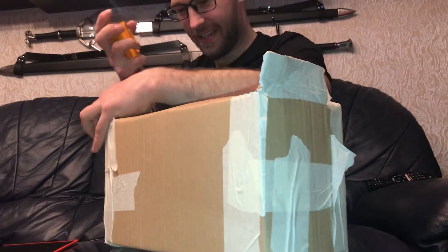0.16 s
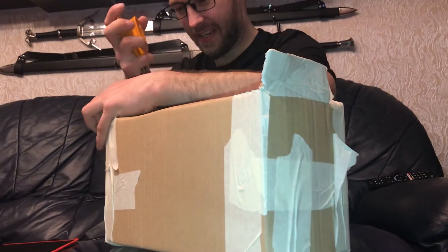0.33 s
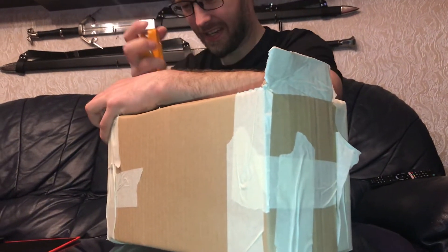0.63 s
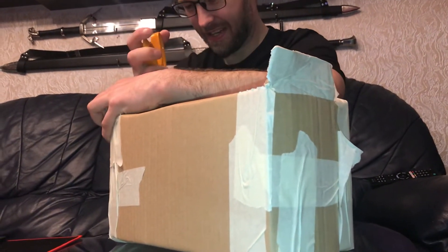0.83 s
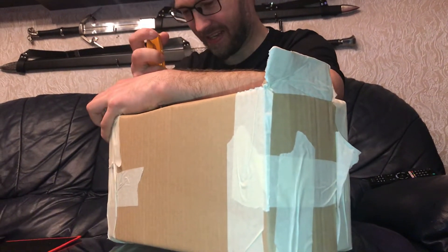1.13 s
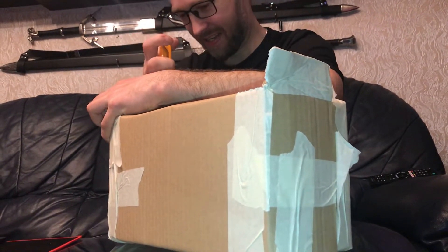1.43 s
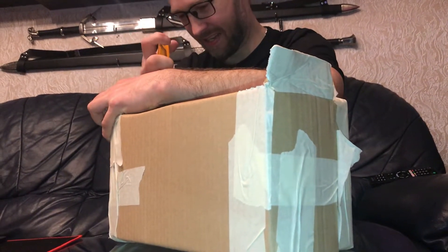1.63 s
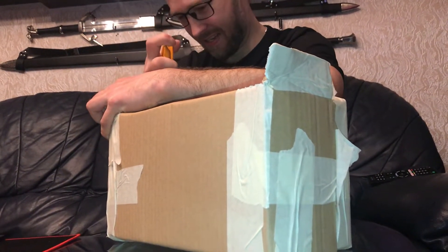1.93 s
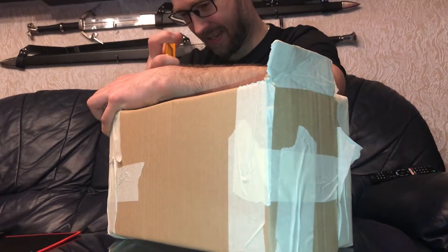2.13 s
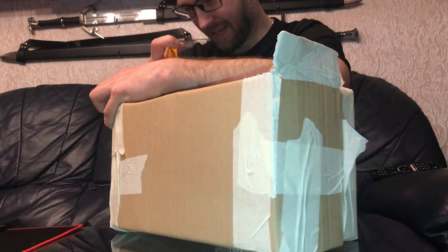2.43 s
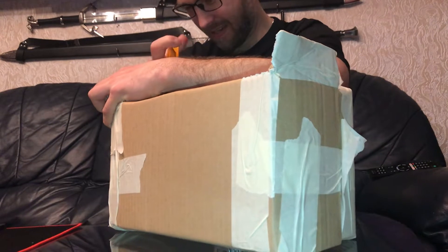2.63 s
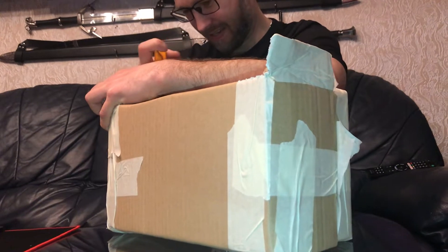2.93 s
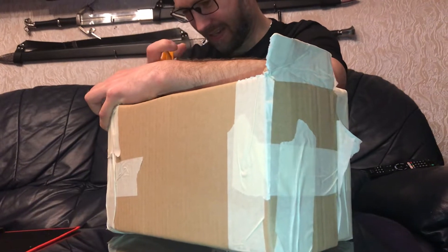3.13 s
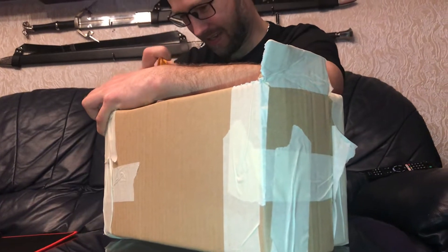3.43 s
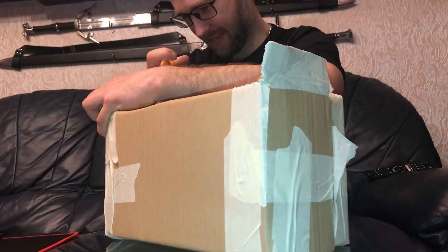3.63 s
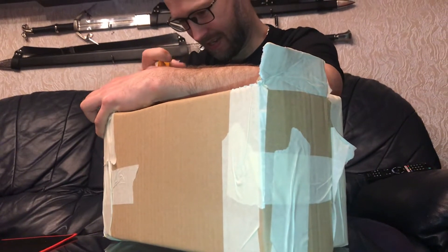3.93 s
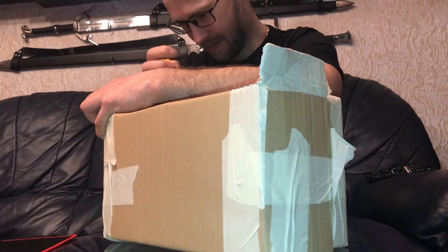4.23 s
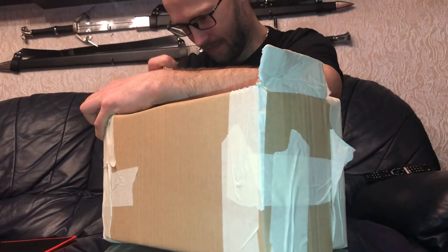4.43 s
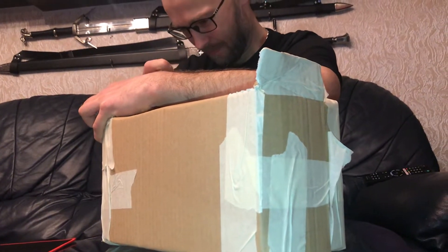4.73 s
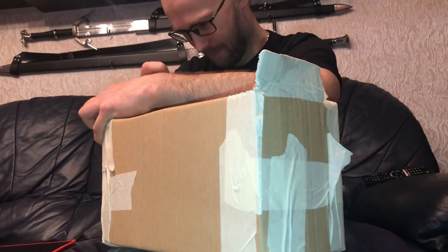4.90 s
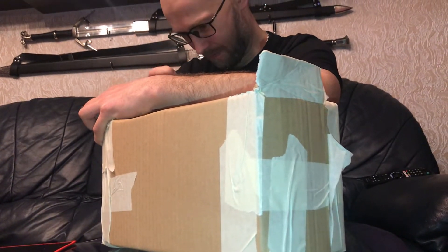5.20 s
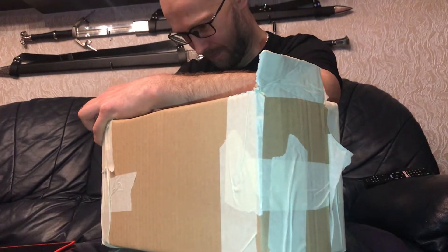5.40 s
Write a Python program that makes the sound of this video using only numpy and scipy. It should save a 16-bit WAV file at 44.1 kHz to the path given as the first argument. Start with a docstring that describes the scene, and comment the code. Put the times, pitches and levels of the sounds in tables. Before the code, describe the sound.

Cardboard and tape are cut up close: gritty scraping, crisp cracks and soft boxy bumps, the loudest snaps coming near the end.

```python
"""A taped cardboard box is cut open with a small knife, close up in a quiet living room.
Under it all lie a low rumble with soft hiss and the faint rustle of an arm on the lid. Tape and board snap
at once: bursts of breaking fibres ring the box, and the room answers briefly. Soft bumps boom the air inside,
creases tick, a faint thin whistle swells; from half a second the blade rasps in strokes of noisy fibre breaks.
The hardest snaps come just after 1 s and near 4.8 s; a faint lower tone joins the last strokes at 5.5 s."""
import sys
import numpy as np
from scipy import signal
from scipy.fft import rfft, irfft
from scipy.io import wavfile

SR = 44100
rng = np.random.default_rng(int(sys.argv[2]) if len(sys.argv) > 2 else 0)


def bounce(signal):
    """Save signal as a 16-bit WAV file at the path given by the first command-line argument."""
    frames = np.transpose(np.atleast_2d(signal))
    limited = np.clip(frames, -1, 1)
    pcm = np.round(limited * 32767).astype(np.int16)
    wavfile.write(sys.argv[1], SR, pcm)


N = 245195


def undb(db):
    """Decibels to gain."""
    return 10 ** (np.asarray(db) / 20)


def unit(x):
    """Scale to an rms of one."""
    return x / np.sqrt(np.mean(x ** 2) + 1e-30)


def contour(points, hz):
    """Read (Hz, value) points on a log-frequency axis."""
    f, value = np.transpose(points)
    return np.interp(np.log(hz + 1), np.log(f), value)


def response(points, size=1024):
    """Causal (minimum-phase) impulse response with the given spectrum."""
    level_db = contour(points, np.fft.rfftfreq(size, 1 / SR))
    cepstrum = irfft(np.log(undb(level_db)))
    # folding the cepstrum forward puts all the sound after the impulse
    cepstrum[1:size // 2] *= 2
    cepstrum[size // 2 + 1:] = 0
    return irfft(np.exp(rfft(cepstrum)))


def ring(modes, size=4096):
    """Impulse response of damped resonances, neighbours swinging in opposite senses; 0 dB is a gain of one."""
    t = np.arange(size) / SR
    out = np.zeros(size)
    for k, (hz, width, db) in enumerate(modes):
        gain = (-1) ** k * undb(db) * 2 * np.pi * width / SR
        out += gain * np.exp(-np.pi * width * t) * np.cos(2 * np.pi * hz * t)
    return out


def through(x, impulse):
    """Pass a sound through an impulse response."""
    return signal.fftconvolve(x, impulse)[:len(x)]


def add(track, s, sound):
    """Mix a sound into the track at time s."""
    start = max(int(s * SR), 0)
    track[start:start + len(sound)] += sound[:N - start]


def walk(rate):
    """Smooth random wander of about unit size, taking a new target `rate` times a second."""
    knots = rng.standard_normal(8192)
    return np.interp(np.arange(N) / SR * rate, np.arange(len(knots)), knots)


def fibres(size, share, spread_db):
    """Tiny breaks of uneven strength, in a given share of all instants."""
    breaks = rng.random(size) < share
    return breaks * rng.standard_normal(size) * undb(spread_db * rng.standard_normal(size))


def blow(x, db):
    """Give a short sound the energy of a steady level held for 10 ms."""
    return x * undb(db) * np.sqrt(.01 * SR / (np.sum(x ** 2) + 1e-30))


# Colour of the quiet room. Each row: frequency in Hz, relative level in dB per Hz.
HUSH_SPECTRUM = [(20, -22), (33, -2), (50, 2), (75, 3.5), (100, -4), (122, 7.5), (160, -2.5), (260, -6.5),
                 (450, -9), (1100, -14), (2000, -20), (4500, -22), (10000, -32.5), (16000, -33.5)]


def hush(level_db=-60.5):
    """The quiet room: steady noise shaped into a low rumble and a soft hiss."""
    colour = undb(contour(HUSH_SPECTRUM, np.fft.rfftfreq(N, 1 / SR)))
    noise = irfft(rfft(rng.standard_normal(N)) * colour, N)
    return unit(noise) * undb(level_db)


# Stiff board resonances. Each row: frequency in Hz, width in Hz, relative level in dB.
BOARD_MODES = [(935, 540, -5), (1128, 164, 3.5), (1379, 89, -1.5), (1632, 110, -6)]
# Colour of cracking tape. Each row: frequency in Hz, relative level in dB per Hz.
CRACK_SPECTRUM = [(700, -6.5), (1300, -2.5), (1750, 1), (2000, 2.5), (2400, 0.5), (2850, 1), (3400, -1.5),
                  (4100, -2.5), (4850, -9), (5800, -10.5), (7500, -26), (12000, -58.5)]
# Bright top of the tape sound. Each row: frequency in Hz, relative level in dB per Hz.
SIZZLE_SPECTRUM = [(3000, -23), (5200, 4), (6500, 7), (7500, 2.5), (9000, 3.5), (10200, -2), (12500, -1),
                   (16000, -5.5)]
# How the arm's rustle comes and goes. Each row: time in seconds, relative level in dB.
RUSTLE = [(0.199, 3), (0.5, -2), (1.7, -2), (2.5, 0), (3.1, 3), (3.8, 5.5), (4.05, -9), (4.65, -14),
          (5.202, 5)]


def fidget(knock_db=-73, crack_db=-73, sizzle_db=-79, wander_db=2.0):
    """The resting arm shifts on the lid: dense tiny breaks of wandering strength rustle board and tape."""
    rub = fibres(N, .15, 0.73) * undb(wander_db * walk(7.8))
    level = undb(np.interp(np.arange(N) / SR, *np.transpose(RUSTLE)))
    knock = undb(knock_db) * unit(through(rub, ring(BOARD_MODES)))
    crack = undb(crack_db) * unit(through(rub, response(CRACK_SPECTRUM)))
    sizzle = undb(sizzle_db) * unit(through(rub, response(SIZZLE_SPECTRUM)))
    return level * (knock + crack + sizzle)


# Tape and board giving way. Each row: start in seconds, strength in dB, extra tape crack in dB,
# extra panel thud in dB, time from start to the thick of the tear in seconds.
SNAPS = [(0.0269, -52.5, 5, -13, 0.0015), (0.273, -56, 5.5, -11, 0.0024), (0.3107, -56.5, 4.5, -11, 0.0029),
         (0.347, -51.5, -0.5, 6.5, .0014), (0.590, -59.5, 2, -19, 0.0037), (1.0451, -33.5, 5.5, 6, 0.0026),
         (1.062, -40.5, 2.5, -3, 0.0014), (1.0982, -36.5, -1.5, 0.5, 0.0023), (1.279, -56.5, -4, -7, .002),
         (1.4986, -43, -10.5, -6, 0.0019), (1.508, -42, -2, -17, 0.0026), (1.524, -39.5, -4.5, -13, 0.0018),
         (1.528, -42, 2, 1, 0.0035), (1.546, -53.5, 8.5, 16.5, 0.0025), (1.9345, -49.5, -5, 0, 0.0019),
         (2.0938, -47.5, 8, 3.5, 0.0012), (2.1093, -46, -4, -23, 0.0011), (2.113, -47, 2, -19, 0.0016),
         (2.1274, -40.5, 2.5, -6, .0012), (2.334, -45, -2.5, 2, 0.0023), (2.3469, -45, -0.5, -8, 0.0024),
         (2.3602, -42.5, -6.5, -3.5, 0.0022), (2.440, -53, -4, -5, .0022), (2.485, -61, -9, 15.5, 0.0045),
         (2.86, -56.5, 1, 13, 0.0026), (2.871, -39.5, -2, -6, 0.002), (2.893, -58.5, -5, 13.5, 0.001),
         (3.333, -41, -7, 0, 0.0022), (3.346, -48, -1, -8, 0.00092), (3.407, -48.5, 3.5, 1.5, 0.002),
         (3.693, -64, 13.5, -12, 0.0012), (4.089, -60, -21.5, 9, 0.0012), (4.2835, -57, -9, -15, 0.0028),
         (4.7145, -48, 3, 3, 0.0031), (4.7215, -48, -3, -6, 0.0017), (4.7953, -27, -2.5, -7.5, 0.0018),
         (4.8119, -28.5, -3, -22, .0013), (4.8595, -22.5, -8, -10, .0015), (5.372, -51, -10, -3, 0.0018)]
# Hollow box panels. Each row: frequency in Hz, width in Hz, relative level in dB.
PANEL_MODES = [(209, 70, -8.5), (303, 40.5, -2), (395, 113, 0), (439.2, 70.7, 1.5)]
# The box flap. Each row: frequency in Hz, width in Hz, relative level in dB.
FLAP_MODES = [(522, 165, 4), (614, 228, 4.5), (860, 128, -8)]


def snaps(thud_db=-2, flap_db=-6, knock_db=1.0, crack_db=-1, sizzle_db=-10, sizzle_slope=1.0,
          flap_loosens_db_per_s=1.29, strain_db=-22, strain_s=0.0018, fray_db=-12, fray_s=0.01, size=4096):
    """Each snap is a quick avalanche of breaking fibres that rings panels, flap, board and tape.
    Returns the sound that comes straight to the microphone and the sound sent into the room."""
    direct, sent = np.zeros(N), np.zeros(N)
    lead = .012  # seconds kept before the break
    t = np.arange(size) / SR - lead
    after = np.maximum(t, 0)
    # stiff board radiates little treble; that comes from the tape
    soft = signal.butter(2, 1900, fs=SR)
    bodies = [signal.lfilter(*soft, ring(modes)) for modes in (PANEL_MODES, FLAP_MODES, BOARD_MODES)]
    bodies += [response(CRACK_SPECTRUM), response(SIZZLE_SPECTRUM)]
    for s, db, tape, panel, length in SNAPS:
        swell = after ** 2 * np.exp(-2 * after / length)
        # the flap swings more freely as the cut goes on
        flap = flap_db + flap_loosens_db_per_s * s
        shares = [thud_db + panel, flap, knock_db, crack_db + tape, sizzle_db + sizzle_slope * tape]
        # a few fibres give just before the break, and the torn edge goes on fraying after it
        strain = blow(fibres(size, 0.3, 3.2) * np.exp(-np.abs(t) / strain_s) * (t < 0), strain_db)
        fray = blow(fibres(size, 0.0065, 3.1) * np.exp(-after / fray_s) * (t > 0), fray_db)
        for body, share in zip(bodies, shares):
            avalanche = blow(rng.standard_normal(size) * swell, 0)
            force = strain + avalanche + fray
            add(direct, s - lead, blow(through(force, body), db + share))
            # summed over all directions the tear has just the smooth colour of the body
            add(sent, s + length, blow(body, db + share))
    return direct, sent


# Narrow resonances that ring on. Each row: frequency in Hz, width in Hz, relative level in dB.
RINGS = [(297.2, 13, 4), (353, 5.4, -3.5), (439, 6.6, -1), (530.6, 11, -2.5), (665, 1.9, -6),
         (799, 3.7, -1.5), (905, 5, 1), (921, 2.6, -4.5), (1098, 3.3, -5), (1193, 11, -6.5),
         (1293, 7.2, -10.5)]


def ringing(x, level_db=2):
    """Lightly damped narrow resonances go on sounding after each excitation."""
    return undb(level_db) * through(x, ring(RINGS, size=20000))


# The room's answer. Each row: band centre in Hz, time to die away by 60 dB in seconds,
# level in dB relative to the sound sent in.
ROOM = [(103.5, 0.25, -11), (285, 0.24, -1), (534, 0.31, -4), (1040, 0.32, -6), (2100, 0.39, -5.5),
        (4030, 0.31, -4), (8550, 0.32, -1.5), (15300, 0.19, 1)]


def room(x, first_s=0.003, build_s=0.00053, size=24000):
    """Dense reflections off near walls and furniture, dying at their own rate in each band."""
    t, hz = np.arange(size) / SR, np.fft.rfftfreq(size, 1 / SR)
    centres = np.array(ROOM)[:, 0]
    noise, tail = rfft(rng.standard_normal(size)), np.zeros(size)
    onset = 1 - np.exp(-np.maximum(t - first_s, 0) / build_s)
    for (_, t60, db), own in zip(ROOM, np.eye(len(ROOM))):
        # each band fades out towards its neighbours' centres
        weight = contour(np.c_[centres, own], hz)
        decay = np.exp(-np.log(1000) * t / t60)
        band = irfft(noise * weight) * onset * decay
        tail += undb(db) * band * np.sqrt(np.mean(weight ** 2) / np.sum(band ** 2))
    return through(x, tail)


# Palm and forearm bumping the box. Each row: start in seconds, level in dB held for 10 ms.
BUMPS = [(0.348, -43.5), (1.048, -55), (1.529, -53), (2.13, -52), (2.487, -76), (2.546, -53.5),
         (2.875, -49), (4.797, -42.5), (4.858, -43)]
# Air inside the box. Each row: frequency in Hz, width in Hz, relative level in dB.
AIR_MODES = [(76, 12, -16), (132, 8.4, -3.5), (160, 71, 4.5)]


def bumps(push_s=0.0057):
    """A soft push makes the air in the box boom."""
    out, t = np.zeros(N), np.arange(4096) / SR
    push = t * np.exp(-2 * t / push_s)
    boom = through(push, ring(AIR_MODES))
    for s, db in BUMPS:
        add(out, s, blow(boom, db))
    return out


# Creasing tape. Each row: start in seconds, level in dB held for 10 ms.
TICKS = [(0.392, -70), (1.640, -59.5), (3.152, -58), (4.112, -68), (4.616, -64.5)]


def ticks(decay_s=0.0032, size=2048):
    """A crease in the tape flips over: a tiny bright crackle of fast-fading noise."""
    out, t = np.zeros(N), np.arange(size) / SR
    for s, db in TICKS:
        flip = rng.standard_normal(size) * np.exp(-t / decay_s)
        add(out, s, blow(through(flip, response(SIZZLE_SPECTRUM)), db))
    return out


# Faint thin whistles. Each row: middle in seconds, half length in seconds,
# pitch in Hz, peak level in dB.
WHISTLES = [(0.513, 0.17, 1480, -65.5), (5.502, 0.066, 850, -58.5)]


def whistles(width_hz=32):
    """Faint thin whistles: noise through a narrow resonance, unsteady in pitch, swelling and fading."""
    out, t = np.zeros(N), np.arange(N) / SR
    for s, half, hz, db in WHISTLES:
        swell = np.exp(-((t - s) / half) ** 2)
        tone = unit(through(rng.standard_normal(N), ring([(hz, width_hz, 0)])))
        out += undb(db) * swell * tone
    return out


# Blade strokes. Each row: moment of hardest pressure in seconds, rise in seconds, fall in seconds,
# strength in dB, brightness in dB (high in tape, low in bare board).
STROKES = [(0.65, 0.065, 0.092, -53, 6.5), (0.93, 0.1, 0.21, -60.5, 1), (1.365, 0.078, 0.062, -49, 2),
           (1.765, 0.037, 0.042, -50, -1), (1.875, .035, 0.023, -76, 24.5), (1.93, 0.015, 0.068, -52, 1.5),
           (2.08, 0.045, 0.075, -53.5, 3), (2.17, 0.058, 0.061, -44.5, 2), (2.29, 0.15, 0.14, -69, 12.5),
           (2.55, 0.079, 0.026, -56.5, -18), (2.67, 0.11, 0.08, -54, 1), (2.785, 0.051, .04, -70.5, 13.5),
           (2.85, .04, 0.046, -51, 0), (3.24, 0.12, .05, -54, -4.5), (3.385, 0.059, 0.14, -54, 4),
           (3.59, 0.028, 0.024, -58, 0), (3.665, 0.045, 0.03, -53, -1), (3.76, 0.078, 0.13, -76, 9),
           (3.875, 0.038, 0.061, -56, -1.5), (3.955, 0.042, .04, -67, 8), (4.17, 0.12, 0.07, -61, -1),
           (4.311, 0.072, 0.049, -47, 0), (4.44, 0.064, 0.067, -47.5, -2.5),
           (5.122, 0.071, 0.036, -49.5, 2), (5.251, 0.045, 0.033, -43.5, 1), (5.41, 0.3, 0.082, -58, 1.5),
           (5.5, 0.058, .1, -61, -6)]
# Colour of the blade rasping in board. Each row: frequency in Hz, relative level in dB per Hz.
RASP_SPECTRUM = [(250, -20.5), (430, -13.5), (530, 0.5), (700, -3.5), (900, -5), (1150, 2.5), (1350, -1.5),
                 (1650, -1), (2300, -40.5), (5000, -52)]
# The cut edge singing under the blade. Each row: frequency in Hz, width in Hz, relative level in dB.
EDGE_MODES = [(1250, 170, 0)]


def strokes(rasp_db=-3.5, edge_db=-7.0, rumble_db=-7, hiss_db=-6, sizzle_db=-13, sizzle_slope=1.52,
            tape_growth=1.2, judder_hz=260, judder_db=2.0, crackle_per_s=170, crackle_db=-11,
            drop_db=15, shape=1.79):
    """The blade parts thousands of fibres a second, catching unevenly as it goes; tape adds coarser crackles.
    Each stroke swells and eases with the pressure, the treble a little faster than the board."""
    out, t = np.zeros(N), np.arange(N) / SR
    force = unit(fibres(N, .15, 1.6) * undb(judder_db * walk(judder_hz)))
    crackle = unit(fibres(N, crackle_per_s / SR, 1.4))
    tearing = force + undb(crackle_db) * crackle
    rasp = undb(rasp_db) * unit(through(force, response(RASP_SPECTRUM)))
    rumble = undb(rumble_db) * unit(through(force, ring(PANEL_MODES)))
    edge = undb(edge_db) * unit(through(fibres(N, .15, 2.6), ring(EDGE_MODES)))
    board = rasp + rumble + edge
    hiss = undb(hiss_db) * unit(through(tearing, response(CRACK_SPECTRUM)))
    sizzle = undb(sizzle_db) * unit(through(tearing, response(SIZZLE_SPECTRUM)))
    for s, rise, fall, db, bright in STROKES:
        # distance from the peak in rises or falls: pressure is down by drop_db at 1
        away = np.maximum((s - t) / rise, (t - s) / fall)
        span = away < 2
        pressure = undb(-drop_db * away[span] ** shape)  # shape 1 is pointed, 2 is rounded
        tape = undb(bright) * hiss[span] + undb(sizzle_slope * bright) * sizzle[span]
        out[span] += undb(db) * (pressure * board[span] + pressure ** tape_growth * tape)
    return out


def scene(stroke_room_db=-1):
    """Knife, tape and box in the room."""
    direct, sent = snaps()
    handling = fidget() + bumps() + ticks() + strokes()
    close = direct + handling + ringing(sent + handling) + whistles()
    reflections = room(sent) + undb(stroke_room_db) * room(handling)
    return (hush() + close + reflections)[None]


def record(dry, bass_hz=43, top_hz=15950):
    """Filters cut the deepest bass and, steeply, the top of the treble."""
    thin = signal.sosfilt(signal.butter(4, bass_hz, "high", fs=SR, output="sos"), dry)
    return signal.sosfilt(signal.ellip(10, .2, 70, top_hz, fs=SR, output="sos"), thin)


dry = scene()
out = record(dry)
bounce(out)
```